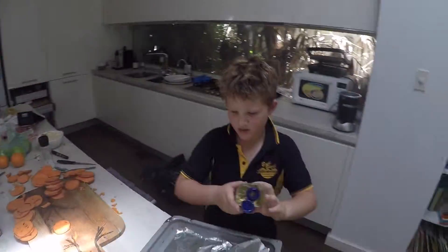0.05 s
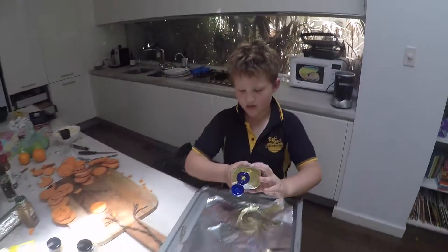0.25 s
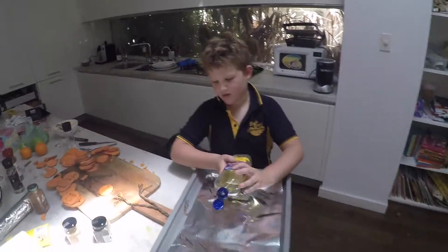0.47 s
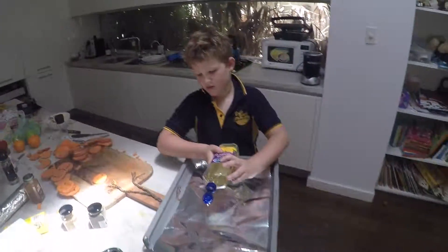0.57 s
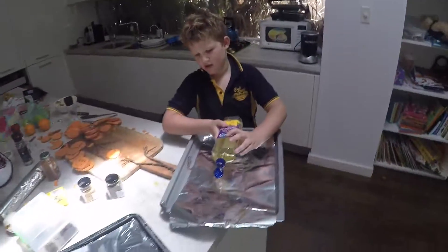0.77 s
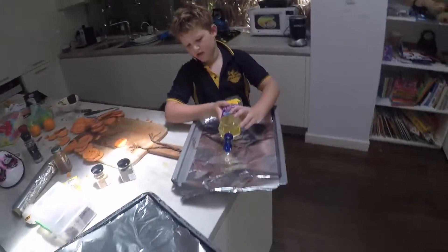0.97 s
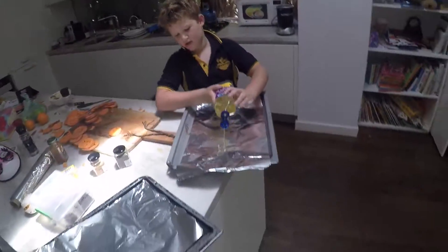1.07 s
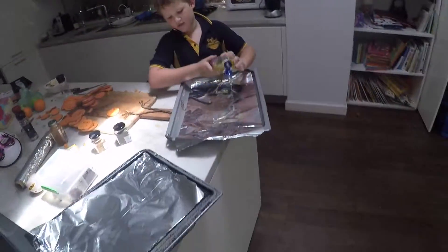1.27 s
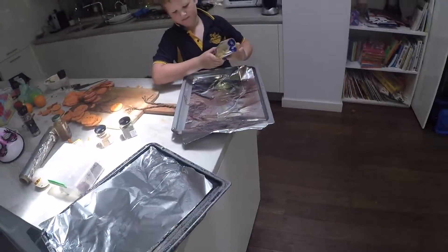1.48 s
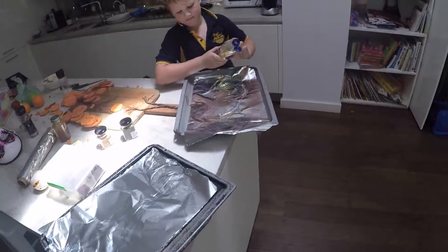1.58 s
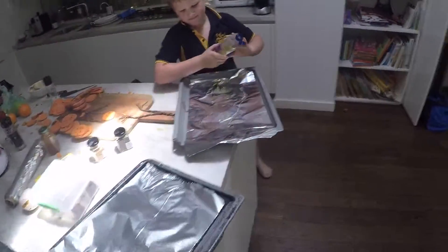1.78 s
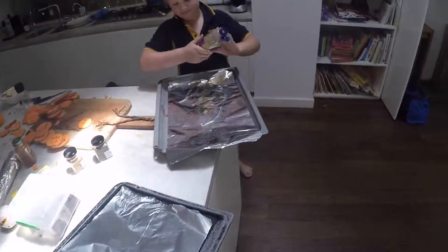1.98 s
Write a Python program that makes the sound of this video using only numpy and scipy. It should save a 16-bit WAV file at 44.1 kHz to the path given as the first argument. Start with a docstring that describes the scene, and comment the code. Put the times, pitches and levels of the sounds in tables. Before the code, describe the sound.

A plastic oil bottle is squeezed in a quiet kitchen, heard close with slight room reverberation. Dull rubbing until 0.15 s gives way to dry snaps, crackles and hollow pings, loudest near 0.2 and 0.7 s. From 0.7 s air glugs through the neck, strongest around 0.77 s, with spurting hisses and a tiny squeak at 1.4 s. At 1.77 s a metal tray is knocked twice, rattling weaker until the end.

```python
"""Oil is squeezed from a plastic bottle onto a foil-lined tray in a kitchen, over room noise and rumble.
Dull rubbing opens the scene (shaped noise); the buckling wall then snaps, crackles and pings
(short damped modes and grit), with hisses of spurting oil. From 0.7 s air pops in through the neck,
ringing neck and growing air space (paired damped sines); the wall squeaks once at 1.42 s. From 1.77 s
a metal tray is knocked twice and rattles in weaker knocks (sheet modes and dense clatter)."""
import sys
import numpy as np
from scipy import signal
from scipy.fft import rfft, irfft
from scipy.io import wavfile

SR = 44100
rng = np.random.default_rng(int(sys.argv[2]) if len(sys.argv) > 2 else 0)


def master_out(mix):
    """Clip the mix to full scale and print it as 16-bit PCM to the path in sys.argv[1]."""
    frames = np.transpose(np.atleast_2d(mix))
    ceiling = np.clip(frames, -1, 1)
    pcm = np.round(ceiling * 32767).astype(np.int16)
    wavfile.write(sys.argv[1], SR, pcm)


N = 89919  # samples


def amp(db):
    """Decibel law: 20 dB is a tenfold amplitude."""
    return 10 ** (np.asarray(db) / 20)


def curve(points):
    """Linear interpolation of a (time [s], value) table over the whole scene."""
    times, values = np.transpose(points)
    return np.interp(np.arange(N) / SR, times, values)


def colour(x, points):
    """Linear filtering: a (frequency [Hz], gain [dB]) table multiplies the spectrum."""
    freqs, gains_db = np.transpose(points)
    hz = np.fft.rfftfreq(len(x), 1 / SR)
    gain = amp(np.interp(np.log(hz + 1), np.log(freqs + 1), gains_db))
    return irfft(rfft(x) * gain, len(x))


def noise(points):
    """Shaped random noise: a filtered Gaussian signal of unit RMS."""
    x = colour(rng.standard_normal(N), points)
    return x / x.std()


def add(mix, start_s, sound):
    """Superposition: the sound is summed into the mix from its start time."""
    part = mix[round(start_s * SR):][:len(sound)]
    part += sound[:len(part)]


def ring(hz, t60, rise_s, length=.08):
    """Damped free oscillation: a decaying sine with a soft start, peak near 1."""
    t = np.arange(0, length, 1 / SR)
    envelope = (1 - np.exp(-t / rise_s)) * amp(-60 * t / t60)
    return envelope / envelope.max() * np.sin(2 * np.pi * hz * t)


def resonate(x, hz, radius, zeros):
    """Forced resonance: a conjugate pole pair responds near one frequency."""
    return signal.lfilter(zeros, [1, -2 * radius * np.cos(2 * np.pi * hz / SR), radius ** 2], x)


# Room noise spectrum: (frequency [Hz], relative density [dB])
ROOM_TONE = [(100, 3.5), (450, -13.5), (720, 5), (1300, -1), (2000, -14.5), (6000, -11.5), (15500, -21)]
# Room noise course: (time [s], level [dB])
ROOM_LEVEL = [(0, -52), (.12, -50.5), (.15, -60), (.8, -49), (.9, -45.5), (1.2, -44.5), (2.04, -40)]


def room_noise():
    """Shaped noise: a fixed colour under a changing level, a quick drop near 0.13 s, then a rise."""
    return amp(curve(ROOM_LEVEL)) * noise(ROOM_TONE)


# Handling rumble spectrum: (frequency [Hz], relative density [dB])
RUMBLE_TONE = [(25, -7.5), (55, -7), (110, -30.5), (300, -85)]
# Handling rumble course: (time [s], level [dB])
RUMBLE_LEVEL = [(0, -30), (.15, -38), (.34, -40), (.48, -47.5), (.74, -31), (.83, -42.5), (.96, -39),
                (1.25, -48.5), (2.04, -47)]


def handling_rumble():
    """Low-frequency random excitation: bass noise swells and sinks with handling."""
    return amp(curve(RUMBLE_LEVEL)) * noise(RUMBLE_TONE)


# Rubbing spectrum: (frequency [Hz], relative density [dB])
RUBBING_TONE = [(100, 3), (500, -11), (1200, -55)]
# Rubbing course: (time [s], level [dB])
RUBBING_LEVEL = [(0, -44), (.14, -37), (.16, -58)]


def rubbing():
    """Friction noise: dull random noise, swelling until 0.14 s and then quickly dropping away."""
    return amp(curve(RUBBING_LEVEL)) * noise(RUBBING_TONE)


KITCHEN_DB, KITCHEN_T60 = -21, 0.23  # level [dB], decay time [s]


def kitchen(x):
    """Diffuse reverberation: convolution with exponentially decaying noise."""
    t = np.arange(0, .4, 1 / SR)
    tail = rng.standard_normal(len(t)) * amp(-60 * t / KITCHEN_T60)
    tail = tail * (t > .006)  # silent gap before the first reflections
    return amp(KITCHEN_DB) * signal.fftconvolve(x, tail / np.linalg.norm(tail))[:N]


# Knocks: (time [s], level [dB], bass gain [dB])
KNOCKS = [(1.774, -12, -4), (1.843, -13.5, 2), (1.866, -18.5, 0.5), (1.908, -18.5, 3), (1.94, -24, 8),
          (1.992, -27, 5.5)]
# Sheet modes: (nominal frequency [Hz], highest level [dB])
TRAY_MODES = [(824, -11), (1141, -11.5), (1227, -10), (1475, -10.5), (1945, -8), (2032, -19), (2466, -5.5),
              (2697, -9.5), (2890, -20), (3013, -5), (3240, -29), (3430, -6.5)]
# Clatter spectrum: (frequency [Hz], relative density [dB])
CLATTER_TONE = [(50, -25), (200, -12), (600, -11), (840, -2.5), (1830, -4), (3300, -4.5), (4200, -9.5),
                (9000, -23), (15500, -47)]
TRAY_T60, TRAY_WANDER = 0.43, .012  # decay [s], full range of relative mode shift between knocks
CLATTER_DB, CLATTER_T60 = -1.5, 0.52  # [dB], [s]
CRACK_DB, CRACK_T60 = 5, 0.012  # [dB], [s]
MUTE_S, MUTE_DB = 1.824, -6.5  # a touch damps the first knock before the second: [s], [dB]


def tray():
    """Modal radiation of a struck sheet: discrete modes over a dense unresolved clatter."""
    out, t = np.zeros(N), np.arange(0, .3, 1 / SR)
    dense = noise(CLATTER_TONE)
    slope = np.gradient(dense)
    bright = slope / slope.std()
    draws = rng.random((len(KNOCKS), len(TRAY_MODES), 2))
    for (start_s, db, bass_db), draw in zip(KNOCKS, draws):
        x = np.zeros(len(t))
        for (hz, mode_db), (a, b) in zip(TRAY_MODES, draw):
            mode_hz = hz * (1 + TRAY_WANDER * (b - .5))
            envelope = amp(mode_db - 60 * t / TRAY_T60 + 3.3 * (a - 1.0))
            x = x + envelope * np.sin(2 * np.pi * (mode_hz * t + b + a))
        # a different stretch of noise for each knock
        shift = round(start_s * SR)
        x = x + amp(CLATTER_DB - 60 * t / CLATTER_T60) * np.roll(dense, shift)[:len(t)]
        x = x + amp(CRACK_DB - 60 * t / CRACK_T60) * np.roll(bright, shift)[:len(t)]
        touch = np.clip((t + start_s - MUTE_S) * 100, 0, 1)  # sets in over 10 ms
        x = x * amp(MUTE_DB * (start_s < MUTE_S) * touch)
        x = colour(np.pad(x, 500), [(700, bass_db), (2600, 0)])[500:-500]
        add(out, start_s, amp(db) * x)
    return out


# Low tray ring: (frequency [Hz], level [dB], rise [s], decay time [s])
BOOM = (119.5, -31.5, .04, 1.0)


def tray_boom():
    """Low-mode resonance: one slowly building bass ring of the tray."""
    out = np.zeros(N)
    hz, db, rise_s, t60 = BOOM
    add(out, 1.85, amp(db) * ring(hz, t60, rise_s, .3))
    return out


# Spurts: (time [s], level [dB], rise [s], decay time [s])
SPURTS = [(0.129, -32.5, 0.0069, 0.11), (0.94, -28.5, 0.0029, 0.51), (1.47, -30.5, 0.072, 0.8)]
# Spurt spectrum: (frequency [Hz], relative density [dB])
SPURT_TONE = [(1500, -28), (3000, -6.5), (7000, -2), (15500, -23.5)]


def spurts():
    """Turbulent flow noise: oil and air hiss through the nozzle, swelling, then fading more slowly."""
    t, level = np.arange(N) / SR, np.zeros(N)
    for start_s, db, rise_s, t60 in SPURTS:
        swell = (1 - np.exp(-t / rise_s)) * amp(db - 60 * t / t60)
        add(level, start_s, swell[:N // 2])
    return level * noise(SPURT_TONE)


# Short wall modes under every snap: (frequency [Hz], level under a 5 kHz snap [dB])
WALL_MODES = [(1950, -21), (3200, -27.5)]
WALL_DB_PER_OCT, WALL_T60 = -9, 0.0072  # brighter snaps stir the modes less; decay [s]
SNAP_CYCLES, SNAP_NOISE = 43.3, 0.51  # ring periods per 60 dB of decay, share of grit
SNAP_TAIL_DB, GRIT_POLE = -14, 0.7  # slower part of the grit [dB], pole radius


def snap(hz, grit):
    """Buckling of a thin shell: a damped ring, a burst of grit and the wall modes."""
    t = np.arange(len(grit)) / SR
    grit = 0.35 * resonate(grit, hz, GRIT_POLE, [1, 0, -1])
    body = (1 - SNAP_NOISE) * ring(hz, SNAP_CYCLES / hz, 0.00011, .03)[:len(t)]
    for mode_hz, db in WALL_MODES:
        mode_db = db + WALL_DB_PER_OCT * np.log2(hz / 5000)
        body = body + amp(mode_db) * ring(mode_hz, WALL_T60, 0.00034, .03)[:len(t)]
    decay = amp(-60 * t / 0.005) + amp(SNAP_TAIL_DB - 60 * t / 0.017)
    return body + SNAP_NOISE * grit * np.minimum(t / 0.00013, 1) * decay


# Clear snaps: (time [s], level [dB], frequency [Hz])
SNAPS = [(0.049, -25, 10200), (0.1618, -15.5, 7400), (0.181, -11, 8750), (0.194, -10, 6700),
         (0.2218, -2.5, 7220), (0.2314, -13.5, 3900), (0.2608, -17.5, 5380), (0.327, -14.5, 5800),
         (0.3718, -13, 5440), (0.4044, -12, 9700.0), (0.4341, -9.5, 9400), (0.451, -13.5, 3200),
         (0.4665, -7, 4900), (0.4843, -7, 7700), (0.51, -19, 3360), (0.5169, -15.5, 6300),
         (0.556, -19, 4960), (0.5731, -11, 5700), (0.5874, -18, 11400), (0.649, -21, 3340),
         (0.6795, -18.5, 3070), (0.7108, -10.5, 5340), (0.7244, 1.5, 5310), (0.7415, -5.5, 5900),
         (0.7582, -3.5, 6010), (0.8026, -20, 3900), (0.831, -15.5, 5250), (0.8472, -10.5, 8800),
         (0.863, -15, 5600), (0.991, -11.5, 5160), (1.0106, -1.5, 7570), (1.025, -25, 10900),
         (1.0544, -15, 4200), (1.1235, -19.5, 4840), (1.1969, -24, 8850), (1.2795, -27, 4240),
         (1.318, -22, 4940), (1.4044, -18.5, 5100), (1.432, -15, 4650), (1.4595, -19.5, 4200),
         (1.49, -19, 7100), (1.5832, -12.5, 5740), (1.63, -17, 3800)]
CLUMP_S, CLUMP_DB = .004, -22  # spread of delays [s], middle relative level [dB]


def wall_snaps():
    """Impulsive release of strain: clear snaps, each followed by three lesser ones."""
    out = np.zeros(N)
    for (start_s, db, hz), grit in zip(SNAPS, rng.standard_normal((len(SNAPS), 800))):
        add(out, start_s, amp(db) * snap(hz, grit))
        for late, size, u in rng.standard_normal((3, 3)):
            lesser = snap(min(hz * 1.1 ** u, 14000), rng.permutation(grit))
            add(out, start_s + CLUMP_S * abs(late), amp(db + CLUMP_DB + 5.6 * size) * lesser)
    return out


# Crackle course: (time [s], base level [dB])
CRACKLE_LEVEL = [(0, -48.5), (.15, -40), (.45, -32), (.65, -31.5), (.8, -39.5), (.9, -42), (1.0, -33.5),
                 (1.5, -37), (2.04, -42.5)]
CRACKLE_SHARE, CRACKLE_SPREAD_DB = 0.325, 3  # share of 1600 draws kept (about 255 per s), [dB]


def wall_crackle():
    """Random point process: many fine snaps with scattered sizes and pitches."""
    out, level = np.zeros(N), curve(CRACKLE_LEVEL)
    draws = rng.random((1600, 4)) * [N / SR, 1, 1, 1]
    for (start_s, keep, u, size), grit in zip(draws, rng.standard_normal((1600, 800))):
        if keep < CRACKLE_SHARE:
            db = level[int(start_s * SR)] - CRACKLE_SPREAD_DB * np.log(size + 0.016)
            add(out, start_s, amp(db) * snap(1700 * 5.38 ** u, grit))
    return out


# Neck hum course: (time [s], resonator gain [dB])
HUM_GAIN = [(.24, -72), (.34, -54.5), (.7, -44.5), (.9, -58)]
HUM_HZ, HUM_WIDTH_HZ, HUM_AIR = 724.8, 10.7, 0.037  # [Hz], [Hz], RMS of the seeping-air noise


def neck_hum(crackling):
    """Driven cavity resonance: crackle and seeping air keep the neck faintly ringing."""
    radius = np.exp(-np.pi * HUM_WIDTH_HZ / SR)
    drive = abs(crackling) + HUM_AIR * rng.standard_normal(N)
    return amp(curve(HUM_GAIN)) * resonate(drive, HUM_HZ, radius, [1, -1])


# Hollow pings of the wall: (time [s], level [dB], frequency [Hz])
PINGS = [(0.079, -27, 1860), (0.0873, -34, 2500), (0.0936, -19.5, 1950), (0.235, -26.5, 2010),
         (0.26, -32, 1900), (0.327, -31, 1340), (0.345, -31, 1096), (0.385, -29.5, 2920),
         (0.45, -27.5, 1420), (0.482, -27, 1880), (0.522, -29.5, 1170), (0.585, -30, 1990),
         (0.697, -23.5, 980), (0.7241, -13, 1912), (1.157, -29, 2030), (1.222, -33, 2060)]
PING_T60, PING_GRIT_DB = 0.016, -0.5  # decay [s], level of the added snap [dB]


def wall_pings():
    """Free vibration of a hollow shell: a short ring with a snap at its onset."""
    out = np.zeros(N)
    for (start_s, db, hz), grit in zip(PINGS, rng.standard_normal((len(PINGS), 800))):
        add(out, start_s, amp(db) * ring(hz, PING_T60, 0.0021))
        add(out, start_s, amp(db + PING_GRIT_DB) * snap(hz * 1.37, grit))
    return out


# Squeak: (time [s], length [s], nominal frequency [Hz], level [dB])
SQUEAK = (1.421, .034, 2680, -42)


def wall_squeak():
    """Frequency modulation: the tone of squeezed plastic rises and falls in one arch."""
    out = np.zeros(N)
    start_s, length, hz, db = SQUEAK
    t = np.arange(0, length, 1 / SR)
    arch = np.sin(np.pi * t / length)
    phase = 2 * np.pi * np.cumsum(hz * (.96 + 0.042 * arch)) / SR
    add(out, start_s, amp(db) * arch ** 0.32 * np.sin(phase))
    return out


def bottle_wall():
    """Superposition of wall sources: snaps and crackle also drive the neck hum."""
    crackling = wall_snaps() + wall_crackle()
    return crackling + neck_hum(crackling) + wall_pings() + wall_squeak()


# Neck resonance: (time [s], frequency [Hz])
NECK_PITCH = [(.8, 755.5), (1.4, 802), (1.75, 847)]
# Air-space resonance, falling as the bottle empties: (time [s], frequency [Hz])
AIR_PITCH = [(.7, 659), (1.1, 529), (1.4, 409), (1.75, 372)]
NECK_T60, AIR_T60 = 0.03, 0.019  # [s]
NECK_ECHO_S, NECK_ECHO_DB, POP_SNAP_DB = .014, -19, -9.5  # [s], [dB], [dB relative to the air ring]


def pop(start_s, neck_db, air_db, bend=1):
    """Coupled cavity resonance: a bursting bubble rings neck and air space in opposite sign."""
    neck_hz = bend * np.interp(start_s, *np.transpose(NECK_PITCH))
    neck = ring(neck_hz, NECK_T60, 0.00048)
    neck = neck + amp(NECK_ECHO_DB) * np.roll(neck, round(NECK_ECHO_S * SR))  # one late repeat
    air_hz = np.interp(start_s, *np.transpose(AIR_PITCH)) / bend
    air = ring(air_hz, AIR_T60, 0.00065)
    add(air, 0, amp(POP_SNAP_DB) * snap(2233, rng.standard_normal(800)))
    return amp(neck_db) * neck - amp(air_db) * air


# Clear air pops: (time [s], neck ring level [dB], air-space ring level [dB])
POPS = [(0.697, -25.5, -37), (0.724, -14, -25), (0.742, -20.5, -25), (0.7695, -1.5, -7.5), (0.804, -9, -12),
        (0.816, -11, -16), (0.845, -21, -24), (0.863, -20.5, -19.5), (0.872, -23.5, -36),
        (0.929, -19.5, -18), (0.946, -35, -16.5), (0.961, -15.5, -31), (0.978, -22, -20), (0.991, -35, -23),
        (1.011, -15.5, -16), (1.025, -28, -20), (1.058, -15.5, -16.5), (1.107, -20.5, -22.5),
        (1.158, -20, -20), (1.167, -12.5, -18), (1.182, -20.5, -24.5), (1.218, -21.5, -19.5),
        (1.243, -23, -24), (1.2805, -19, -15), (1.299, -26, -34), (1.318, -35, -19), (1.351, -19.5, -17),
        (1.358, -23, -24), (1.38, -17, -15.5), (1.403, -18, -16), (1.46, -21.5, -22), (1.581, -27, -43),
        (1.592, -19, -49), (1.646, -26, -18.5), (1.706, -20, -18.5), (1.724, -18, -29), (1.742, -25, -25)]
# Small pops: (time [s], middle level [dB])
FIZZ_LEVEL = [(.3, -57), (.66, -51.5), (.85, -35), (1.5, -34.5), (1.75, -42.5)]
FIZZ_SHARE, PITCH_SCATTER = 0.4, 0.15  # share of 800 draws kept (about 157 per s), relative bend


def glugs():
    """Bubble-excited resonance: clear pops and a random patter, with little bass radiated."""
    out, level = np.zeros(N), curve(FIZZ_LEVEL)
    for start_s, neck_db, air_db in POPS:
        add(out, start_s, pop(start_s, neck_db, air_db))
    for start_s, keep, a, b, c in rng.random((800, 5)) * [N / SR, 1, 1, 1, 1]:
        if keep < FIZZ_SHARE:
            db = level[int(start_s * SR)]
            neck_db, air_db = db + 14 * (a - .5), db + 14 * (b - .5)
            add(out, start_s, pop(start_s, neck_db, air_db, 1 + PITCH_SCATTER * (2 * c - 1)))
    return signal.lfilter(*signal.butter(2, 240, "high", fs=SR), out)


# Side signal, half the left-right difference: (frequency [Hz], gain [dB])
SIDE_GAIN = [(30, -81), (200, -19), (2000, -84), (5000, -40), (14000, -19)]


def stereo(mid):
    """Decorrelation: a briefly smeared copy is added on the left and subtracted on the right."""
    smear = rng.standard_normal(300) * amp(-np.arange(300) / 10)
    smeared = np.convolve(mid, smear / np.linalg.norm(smear))[:N]
    side = colour(smeared, SIDE_GAIN)
    return np.array([mid + side, mid - side])


def scene():
    """Linear superposition: background, near sources and their reverberation."""
    background = room_noise() + handling_rumble() + rubbing()
    near = tray() + tray_boom() + spurts() + bottle_wall() + glugs()
    return stereo(background + near + kitchen(near))


def record(dry):
    """Saturation and band limitation: soft overload, then a low-pass at 16.3 kHz."""
    overloaded = np.tanh(dry / 1.288) * 1.329
    low_pass = signal.firwin(511, 16300, window=("kaiser", 9), fs=SR)
    return signal.oaconvolve(overloaded, low_pass[None], "same")


dry = scene()
out = record(dry)
master_out(out)
```